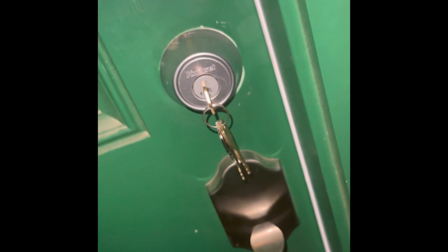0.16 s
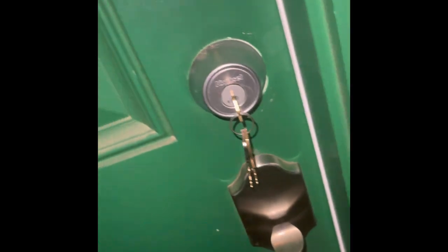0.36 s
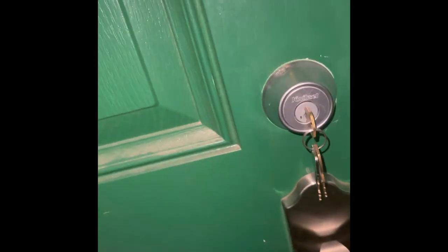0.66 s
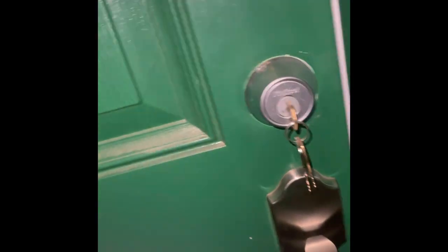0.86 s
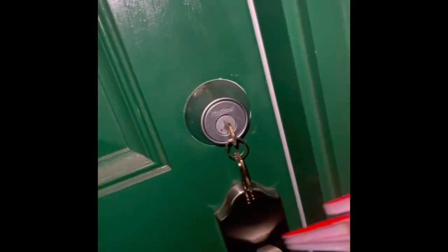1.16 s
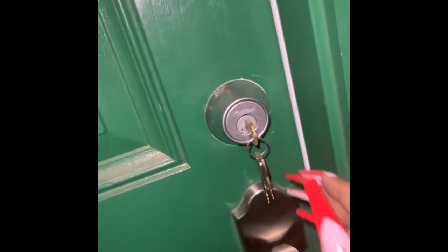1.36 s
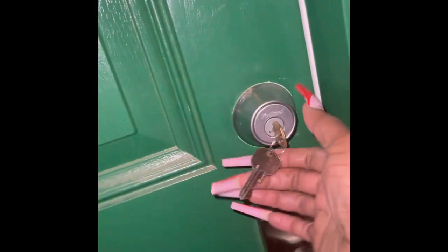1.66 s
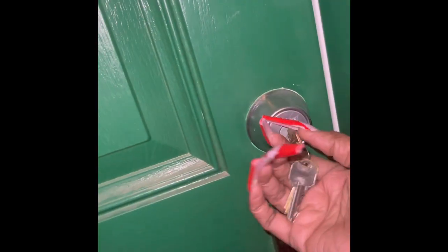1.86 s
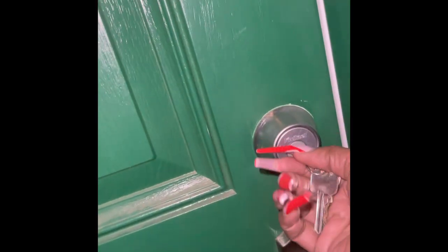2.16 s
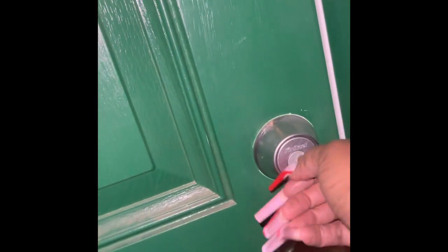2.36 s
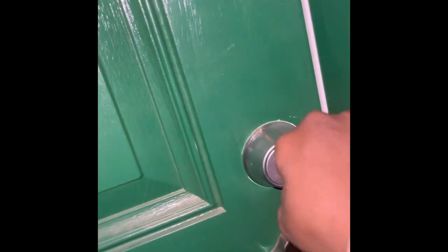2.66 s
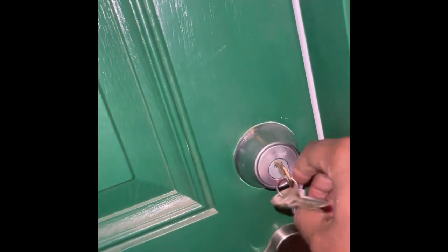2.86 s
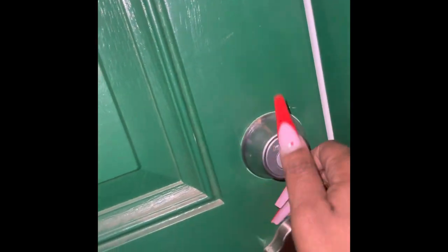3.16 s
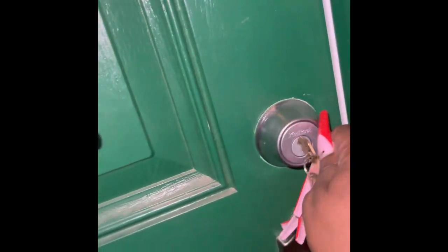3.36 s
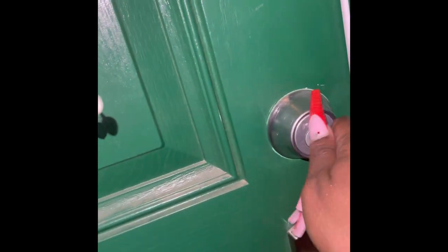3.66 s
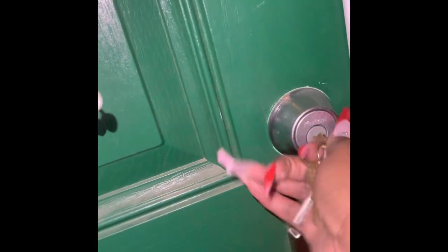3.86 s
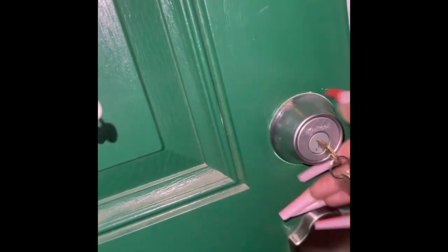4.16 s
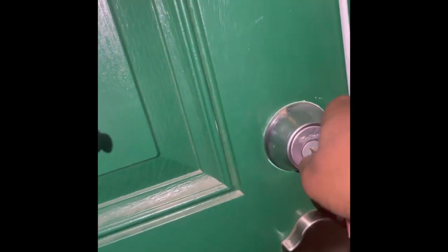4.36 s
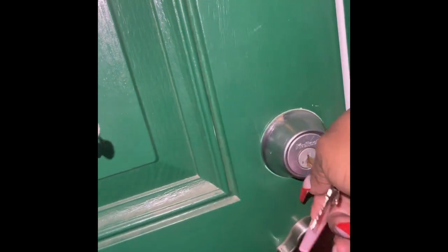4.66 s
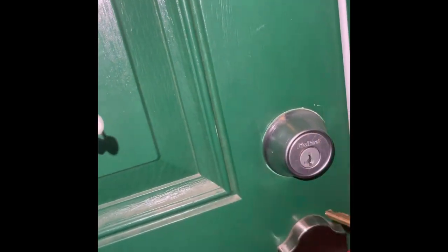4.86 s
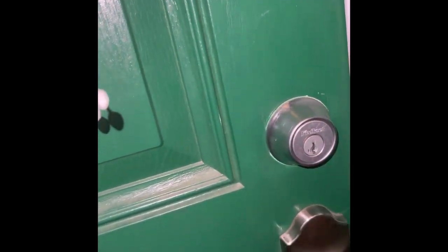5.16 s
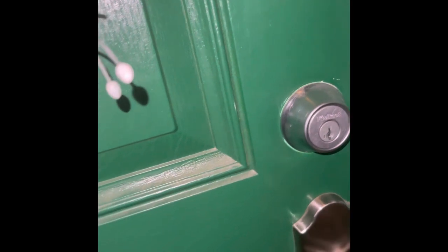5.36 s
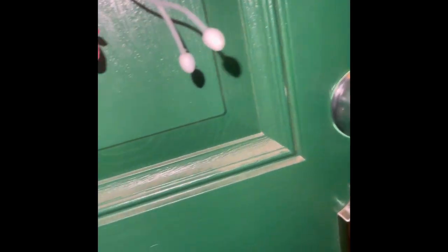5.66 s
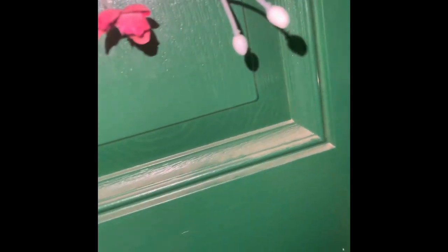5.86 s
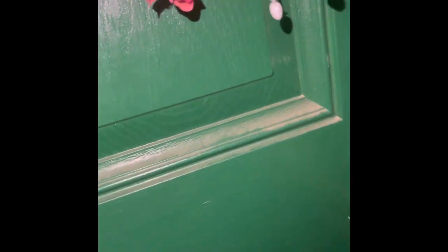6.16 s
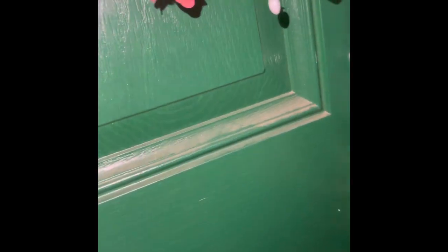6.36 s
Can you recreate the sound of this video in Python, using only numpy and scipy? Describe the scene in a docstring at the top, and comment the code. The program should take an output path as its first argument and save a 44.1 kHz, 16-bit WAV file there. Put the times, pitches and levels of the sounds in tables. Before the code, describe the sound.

A close hand-held microphone picks up a front door lock in a small, quiet porch. From 0 to 1.2 seconds, the shifting grip makes strong rustling, humming rubs, dull bumps and crisp clicks, easing gradually. Around 1.55 to 1.9, keys clink brightly with short rings, small ticks and a scuff. From 2.3, a key scrapes softly against brass pins; a click comes at 2.75, then a hard double clack at 2.98 as the bolt snaps and rings, with keys jingling until 3.4. Another ringing click falls near 3.65, followed by light scratching, faint clinks and a small thud at 4.74. After a quieter pause, loose keys rattle at 5.45 to 5.6. At 5.74 the door gives the loudest sound, a sharp woody knock with deep rumble, then brushes along its seal with small bumps, fading into still air by 6.5.

```python
"""A hand works a key in the deadbolt of a panelled front door, close to a hand-held microphone.
First the grip rustles (rubbing noise and a humming housing) with dull bumps; keys clink in ringing modes.
The lock clicks in short noise bursts, brass pins ring under scraping hiss, and the bolt snaps back ringing.
The key is drawn out, the bunch jangles in dense touches, and the door gives with a modal knock
and brushes along its seal. Reflections of the porch, handling rumble and still air lie around it all."""
import sys
import numpy as np
from scipy import signal
from scipy.fft import rfft, irfft, next_fast_len
from scipy.io import wavfile

SR = 44100
rng = np.random.default_rng(int(sys.argv[2]) if len(sys.argv) > 2 else 0)


def to_wav(s):
    """Save 16-bit WAV."""
    ch = np.atleast_2d(s).T  # columns
    pcm = np.round(np.clip(ch, -1, 1) * 32767)  # PCM
    wavfile.write(sys.argv[1], SR, pcm.astype(np.int16))


N = 287532
TIME = np.arange(N) / SR

# ringing modes of the keys when left free: pitch_hz, level_db, t60_s
KEY_MODES = [(7350, -2.5, 0.21), (7800, -0.5, 0.11), (8060, 0.5, 0.24), (10180, -1, 0.3),
             (10490, 3.5, 0.32), (10800, -12, 0.099), (11780, -3.5, 0.25), (12850, -5, 0.15),
             (14150, -16, 0.22)]


def from_db(db):
    """Decibels to gain."""
    return 10 ** (np.asarray(db) / 20)


def rms_one(x):
    """Scale to unit power."""
    return x / np.sqrt(np.mean(x ** 2) + 1e-20)


def in_time(rows):
    """The columns of a curve, sample by sample."""
    s, *columns = np.transpose(rows)
    return [np.interp(TIME, s, column) for column in columns]


def at_hz(points, hz):
    """Read a table on a log-frequency axis."""
    f, value = np.transpose(points)
    return np.interp(np.log(np.maximum(hz, 1)), np.log(f), value)


def bins(size):
    """Frequencies of a real spectrum in Hz."""
    return np.arange(size // 2 + 1) * SR / size


def band(x, low_hz, high_hz, order=2):
    """Causal band-pass."""
    edges = [low_hz, min(high_hz, SR / 2 - 1000)]
    return signal.sosfilt(signal.butter(order, edges, "band", fs=SR, output="sos"), x + 1e-18)


def add(track, s, sound):
    """Mix a short sound in at time s."""
    i = max(round(s * SR), 0)
    track[..., i:i + sound.shape[-1]] += sound[..., :N - i]


def drift(rate_hz):
    """A smooth random curve through normal draws of spread 1, rate_hz of them a second."""
    knots = np.arange(0, N / SR + 1, 1 / rate_hz)
    return np.interp(TIME, knots, rng.standard_normal(8192)[:len(knots)])


def ring(impulses, hz, t60):
    """A damped resonator: a unit impulse sets a sine of height 1 ringing."""
    r, w = from_db(-60 / (t60 * SR)), 2 * np.pi * hz / SR
    return signal.lfilter([0, np.sin(w)], [1, -2 * r * np.cos(w), r * r], impulses + 1e-18)


def resonate(x, hz, width_hz):
    """A resonance with gain 1 on top."""
    r = np.exp(-np.pi * width_hz / SR)
    zeros = np.array([1, 0, -1]) * (1 - r * r) / 2
    poles = [1, -2 * r * np.cos(2 * np.pi * hz / SR), r * r]
    return signal.lfilter(zeros, poles, x + 1e-18)


def spread(pair, colour=None):
    """Two unrelated signals become left and right, as alike as the ports hear them."""
    # likeness of the two microphone ports: pitch_hz, likeness (0-1)
    likeness = [(60, 1), (250, 0.99), (700, 0.51), (1500, 0.063), (4500, 0.31), (6500, 0.96), (10000, 0.96),
                (14000, 0.12)]
    size = next_fast_len(N + 4096)
    hz = bins(size)
    mid, side = rfft(pair, size)
    alike = np.clip(at_hz(likeness, hz), 0, 1)
    both = np.sqrt((1 + alike) / 2) * mid + np.sqrt((1 - alike) / 2) * side * [[1], [-1]]
    gain = 1 if colour is None else from_db(at_hz(colour, hz))
    return irfft(both * gain, size)[:, :N]


def contacts(force):
    """All hard contacts: clicks, one rebound of each, and stray ticks whose level follows the rubbing."""
    # key, pins, fingernails and latch touching: start_s, crack_level_db, sizzle_over_crack_db, crack_pitch_hz
    click_rows = [(0.086, -24.5, -2, 6050), (0.1884, -17, 3, 3430), (0.363, -26.5, -5, 4360),
                  (0.593, -30, -14, 3240), (0.621, -28, -0.5, 4400), (0.661, -29, -8, 2800),
                  (0.899, -28, -0.5, 4500), (0.9482, -34.5, -21, 1710), (1.085, -33.5, -7, 3900),
                  (1.2628, -26, 0, 4000), (1.4335, -42, -24, 3900), (1.6119, -36.5, -12, 3300),
                  (1.6306, -33.5, -1.5, 1510), (1.6573, -29.5, 8.5, 2960), (1.7512, -39, -6, 3140),
                  (1.767, -37, -6, 1600), (1.829, -33.5, 0, 2770), (1.847, -35.5, -4, 4300),
                  (1.8639, -36, 3, 3520), (2.1213, -46, -0.5, 3000), (2.291, -42, 1, 3080),
                  (2.5299, -26, -19, 3800), (2.572, -29.5, -3, 3180), (2.755, -25, 3, 3280),
                  (2.8793, -33, 4.5, 4060), (2.9356, -37.5, 10.5, 2080), (2.975, -12.5, -16, 3400),
                  (2.985, -16.5, -11, 2260), (3.2682, -36.5, -5.5, 3620), (3.311, -37.5, -6, 2720),
                  (3.3455, -42, 7, 3250), (3.5487, -33, 4.5, 3400), (3.6162, -38, 6, 2220),
                  (3.6644, -25.5, 9.5, 6050), (3.859, -44.5, 10, 2600), (3.947, -38.5, 1.5, 3500),
                  (4.0936, -33, 6.5, 4560), (4.2893, -35.5, 7.5, 4500), (4.311, -31.5, -4, 5330),
                  (4.336, -34.5, -6, 3520), (4.4216, -45, -4, 2040), (4.581, -41, 9.5, 3400),
                  (4.713, -31.5, 4.5, 3100), (4.738, -27, 2.5, 3100), (4.9042, -41, -20, 2800),
                  (5.6542, -28, -0.5, 4200), (5.739, -16.5, -5, 2860), (5.7423, -14.5, -5, 3220),
                  (5.9345, -33.5, -18, 1990), (6.106, -37, -10, 2250), (6.157, -44.5, -14, 1700),
                  (6.414, -42, -6, 1500)]
    rebound_s, rebound_loss_db = 0.011, 13
    tick_count, tick_over_rub_db, tick_spread_db = 140, 3, 4

    rebounds = []
    for (s, db, bright_db, hz), (late, luck) in zip(click_rows, rng.uniform(-1, 1, (len(click_rows), 2))):
        rebounds.append((s + rebound_s * 2 ** late, db - rebound_loss_db + 3 * luck, bright_db, hz))

    ticks = []
    moments = rng.integers(0, N, tick_count)
    for i, (size, hard, pitch) in zip(moments, rng.uniform(-1, 1, (tick_count, 3))):
        db = 20 * np.log10(force[i] + 1e-6) + tick_over_rub_db + tick_spread_db * size
        ticks.append((TIME[i], db, 6 * hard - 6, 3000 * 2 ** (.7 * pitch)))
    return [*click_rows, *rebounds, *ticks]


def clicks(rows, rattle_db=-23, rattle_s=0.016, pitch_width_hz=700, broad_share=0.6):
    """Noise bursts give each contact a body, a pitched crack and a sizzle, coloured by the lock case."""
    # resonances of the lock case: pitch_hz, width_hz, level_db
    case_modes = [(2165, 190, 3), (2910, 2070, 4), (5760, 3800, 1.5), (9420, 4300, 9.5)]
    # body, crack and sizzle: low edge and high edge (Hz), decay (s)
    layers = ((220, 1300, .003), (1500, 6000, .0012), (6500, 12000, .001))
    # the hollow body grows more slowly than the crack
    body_at_0_db_crack, body_follows = -24, 0.65

    t, window = TIME[:4096], round(.006 * SR)
    noise = rng.standard_normal((len(rows), 3, 2, len(t)))
    out = np.zeros((2, N))
    for k, (low, high, decay_s) in enumerate(layers):
        # the slower decay is a short rattle of loose parts
        burst = noise[:, k] * (np.exp(-t / decay_s) + from_db(rattle_db) * np.exp(-t / rattle_s))
        coloured = sum(from_db(db) * resonate(burst, hz, width) for hz, width, db in case_modes)
        burst = band(0.14 * burst + coloured, low, high, order=4)
        for (s, db, bright_db, hz), sound in zip(rows, burst):
            if k == 1:
                sound = broad_share * sound + resonate(sound, hz, pitch_width_hz)
            level_db = (body_at_0_db_crack + body_follows * db, db, db + bright_db)[k]
            loudness = np.std(sound[:, :window], axis=1, keepdims=True)
            add(out, s, from_db(level_db) * sound / loudness)
    return spread(out)


def bolt(focus_db=14):
    """The steel bolt rings on after each stop, most near the pitch that the blow favours."""
    # the bolt hits its stops: start_s, level_db (before the mode levels), favoured_pitch_hz
    snaps = [(2.755, -44, 4700), (2.9754, -27.5, 4300), (2.985, -36, 6675), (3.664, -39.5, 6675),
             (3.688, -49.5, 2046)]
    # modes of the bolt and its spring: pitch_hz, level_db, t60_s
    modes = [(2046, 2, 0.24), (3941, -2.5, 0.54), (4517, -10, 0.197), (6675, 6, 0.33)]
    out = np.zeros(N)
    for hz, mode_db, t60 in modes:
        blows = np.zeros(N)
        for s, db, lead_hz in snaps:
            octaves_off = np.log2(hz / lead_hz)
            add(blows, s, from_db([db + mode_db - focus_db * octaves_off ** 2 / 2]))
        out += ring(blows, hz, t60)
    return out


def clinks(focus_db=6, focus_hz=200, chatter_s=0.0082, settle_db=-4, settle_s=0.034, detune_hz=20, uneven_db=4):
    """Keys ring in their modes after a brief rattle; the contact favours one mode, the fingers damp them."""
    # key against key: start_s, level_db (before the trim in the scene), favoured_pitch_hz,
    # share of the free ringing time that the hand leaves (0-1), rattle_over_ring_db
    clink_rows = [(1.556, -20, 10490, 0.88, -2), (1.7307, -34.5, 10490, 0.34, -7),
                  (1.7662, -12, 10490, 0.3, -7), (1.771, -22, 7350, 0.15, -11),
                  (2.9, -24.5, 7350, 0.43, -12), (2.986, -20, 10490, 0.82, -12),
                  (2.9964, -21, 11780, 1, -11), (3.052, -25, 10490, 0.45, -19),
                  (3.1337, -14, 10490, 0.33, -13), (3.15, -14, 7800, 0.71, -12),
                  (3.193, -27.5, 11780, 0.4, -9), (3.311, -31.5, 8060, 0.9, -6),
                  (3.6273, -27, 7350, 0.73, -1), (4.045, -24.5, 11780, 1, -7),
                  (4.122, -32, 11780, 0.59, -4), (4.4, -35, 11780, 1, -7), (5.015, -31, 10800, 0.23, -2),
                  (5.087, -43.5, 7800, .4, 0), (5.1278, -35, 10800, 0.55, -14),
                  (5.4555, -31, 7350, 0.6, 3.5), (5.488, -29.5, 12850, 0.44, 10),
                  (5.521, -28, 10180, 0.43, 8), (5.581, -27, 10490, 0.25, 7)]
    t, out = TIME[:10000], np.zeros((2, N))
    hz, mode_db, t60 = np.transpose(KEY_MODES)[:, :, None]
    chance = rng.standard_normal((len(clink_rows), 4, len(hz), 1))
    chatters = rattle((len(clink_rows), len(t))) * np.exp(-t / chatter_s)
    # the keys lose part of their swing as they settle against each other
    settle = np.exp(-t / settle_s) + from_db(settle_db)
    onset = 1 - np.exp(-t / .0004)
    for row, (strength, grip, detune, phase), chatter in zip(clink_rows, chance, chatters):
        s, db, lead_hz, free, rattle_db = row
        favour_db = focus_db * np.exp(-((hz - lead_hz) / focus_hz) ** 2)
        gain = from_db(mode_db + uneven_db * strength + favour_db)
        damped_t60 = t60 * free * np.exp(-np.abs(grip) / 2)
        fade = settle * np.exp(-np.log(1000) * t / damped_t60)
        sines = np.sin(2 * np.pi * (hz + detune_hz * detune) * t + np.pi * phase)
        modes = np.sum(gain * fade * sines, axis=0)
        # both parts are levelled over their first 12 ms
        sound = modes / np.std(modes[:530]) + from_db(rattle_db) * chatter / np.std(chatter[:530])
        add(out, s, from_db(db) * sound * onset)
    return out


def jingle(per_s=400, flutter_db=7.5, ring_share=0.21, rattle_db=-8):
    """Many faint touches keep the keys shimmering while the hand moves them; hanging free, they rattle more."""
    # spells of restless keys: start_s, end_s, level_db (before flutter)
    spells = [(1.77, 1.848, -47), (2.82, 3.184, -41), (2.974, 3.036, -35), (3.304, 3.41, -43),
              (4.176, 4.234, -37), (5.468, 5.578, -39)]
    # the bunch hangs free and shakes: start_s, end_s, rattle_level_db (before flutter)
    free_shake = (5.48, 5.585, -35)
    touches = rng.random(N) < per_s / SR
    shimmer = np.zeros(N)
    for hz, db, t60 in KEY_MODES:
        shimmer += ring(touches * rng.standard_normal(N) * from_db(db), hz, t60 * ring_share)
    shimmer = rms_one(band(shimmer, 5800, 14800, order=4))
    motion = sum(spell(*row) for row in spells)
    knocking = rattle(N) * (from_db(rattle_db) * motion + spell(*free_shake))
    return (shimmer * motion + knocking) * from_db(flutter_db * drift(70))


def rattle(shape, per_s=2500):
    """Keys and ring knock together too fast to ring out: a dense, broad, metallic cluster."""
    # broad resonances of the whole bunch on its ring: pitch_hz, width_hz, level_db
    bunch_modes = [(6190, 350, -0.5), (7170, 860, -7), (10100, 580, 13.5), (10800, 860, 8), (12850, 330, 4),
                   (14300, 400, -10.5)]
    touches = rng.standard_normal(shape) * (rng.random(shape) < per_s / SR)
    # neighbouring resonances alternate in sign
    cluster = sum((-1) ** k * from_db(db) * resonate(touches, hz, width)
                  for k, (hz, width, db) in enumerate(bunch_modes))
    return rms_one(band(cluster, 4500, 17400))


def spell(start, end, db, swell_s=0.01, die_s=0.027):
    """The keys swing up to a level and die away once the hand stops."""
    swell = 1 - np.exp(-np.maximum(TIME - start, 0) / swell_s)
    return from_db(db) * swell * np.exp(-np.clip(TIME - end, 0, 1) / die_s)


def door(swell_cycles=0.59):
    """Leaf modes swell over a part of their cycle, so low ones come late; hard blows wake the woody panels."""
    # blows on the leaf: start_s, level_db (before the mode levels), hardness_hz (drive falls off above it)
    blows = [(1.418, -37.5, 100), (1.829, -39, 400), (2.975, -35, 500), (4.737, -37.5, 800),
             (5.74, -12, 3500), (5.934, -28, 250), (5.985, -26, 150)]
    # modes from the whole leaf up to its thin panels: pitch_hz, level_db, t60_s
    modes = [(53.6, -1.5, 0.33), (116.2, -0.5, 0.39), (154.8, -10, 0.34), (184.4, 0, 0.14), (241, -5, 0.23),
             (274, -6, 0.1), (447, -3.5, 0.071), (522, -16.5, 0.22), (762, -9.5, 0.2), (1163, -5.5, 0.11),
             (1850, -8, 0.071), (2205, -19.5, 0.17), (2550, -10, 0.083), (2970, -14, .12),
             (3390, -12, 0.092)]
    t, out = TIME[:SR // 2], np.zeros(N)
    hz, mode_db, t60 = np.transpose(modes)[:, :, None]
    swell = 1 - np.exp(-t * hz / swell_cycles)
    shape = from_db(mode_db) * swell * np.exp(-np.log(1000) * t / t60)
    for (s, db, hard_hz), phase in zip(blows, rng.standard_normal((len(blows), len(hz), 1))):
        drive = from_db(db) / np.hypot(1, (hz / hard_hz) ** 2)
        add(out, s, np.sum(drive * shape * np.sin(2 * np.pi * hz * t + phase), axis=0))
    return out


def strokes(attack_s=0.0072, release_s=0.028):
    """Strength of the dull rub and of the hiss: each stroke swells, holds and lets go."""
    # hand, key in its cylinder, door on its seal: start_s, length_s, dull_rub_db, hiss_db (before later trims)
    stroke_rows = [(0.069, 0.0077, -38, -43), (0.173, 0.0089, -34, -36), (1.597, 0.07, -38.5, -55),
                   (1.769, 0.015, -33.5, -42.5), (1.818, 0.048, -32, -43.5), (1.974, 0.023, -40.5, -52.5),
                   (2.315, 0.3, -40.5, -55.5), (2.747, 0.047, -36.5, -45.5), (2.864, 0.18, -39, -49),
                   (3.028, 0.16, -43.5, -49), (3.291, 0.14, -44.5, -48.5), (3.508, 0.17, -42.5, -48),
                   (3.75, 0.3, -45, -50.5), (4.069, 0.17, -40, -53.5), (4.269, 0.2, -44, -50),
                   (4.531, 0.17, -44, -52), (4.706, 0.062, -33, -53), (5.445, 0.14, -32, -44),
                   (5.614, 0.12, -30, -50), (5.737, 0.35, -35, -43), (6.217, 0.081, -39.5, -50.5)]
    t, out = TIME[:SR], np.zeros((2, N))
    for start, length, rub_db, hiss_db in stroke_rows:
        shape = (1 - np.exp(-t / attack_s)) * np.exp(-np.maximum(t - length, 0) / release_s)
        add(out, start, from_db([[rub_db], [hiss_db]]) * shape)
    return out


def scraping(force, uneven_db=1.0, scratch_share=0.27, pin_share=1.2):
    """Hiss and scratches follow the force of the rubbing; the pins join in while the key is worked."""
    # the key is being worked in the cylinder: time_s, share (0-1)
    key_work = [(2.2, 0), (2.4, 1), (4.7, 1), (4.8, 0)]
    # colour of the rubbing hiss: pitch_hz, level_db (per Hz)
    hiss_colour = [(800, -8.5), (1500, 7.5), (2200, 6.5), (2800, 9.5), (3600, 6), (5000, -8.5), (6500, -12),
                   (8500, -2), (10800, 2.5), (12200, -22), (14000, -56)]
    # colour of the bright sizzle of hard rubbing: pitch_hz, level_db (per Hz)
    sizzle_colour = [(2500, -18), (4000, -0.5), (6300, 1.5), (8500, 3), (10700, 5), (12300, -8.5),
                     (14000, -50.5)]
    working, = in_time(key_work)
    force_db = 20 * np.log10(force + 1e-6) + uneven_db * drift(30)
    scratches = scuffs(hiss_colour, per_s=55, size_db=5, catch_s=.002)
    grain = scratch_share * scratches + pin_share * band(pins(), 1340, 8000) * working
    smooth = friction(hiss_colour, grains_per_s=900, grain_db=4.0, smooth_share=0.35, flutter_db=4.5)
    hiss = from_db(force_db - 4.0) * (smooth + grain)
    # hard rubbing grows bright faster than it grows loud
    sizzle_db = force_db + 0.46 * (force_db + 40.5)
    sizzle = scuffs(sizzle_colour, per_s=480, size_db=1.0, catch_s=0.0047)
    return hiss + from_db(sizzle_db - 0.3) * sizzle


def pins(per_s=70, size_db=6, cycles=16, low_hz=1950, high_hz=5200, count=18):
    """The key's teeth trip small brass parts; each gives a brief note of its own."""
    sizes = from_db(size_db * np.minimum(rng.exponential(1, N), 2)) * rng.choice([-1, 1], N)
    trips = sizes * (rng.random(N) < per_s / SR)
    dealt = rng.integers(0, count, N)
    pitches = np.geomspace(low_hz, high_hz, count)
    return rms_one(sum(ring(trips * (dealt == k), hz, cycles / hz) for k, hz in enumerate(pitches)))


def scuffs(colour, per_s, size_db, catch_s):
    """The surfaces catch and let go: tiny scratches of uneven size that start at once and die fast."""
    sizes = from_db(size_db * np.minimum(rng.exponential(1, N), 2))
    catches = (rng.random(N) < per_s / SR) * sizes
    force = signal.lfilter([1], [1, -np.exp(-1 / (catch_s * SR))], catches + 1e-18)
    return rms_one(spread(rng.standard_normal((2, N)) * force, colour))


def friction(colour, grains_per_s, grain_db, smooth_share, flutter_db):
    """Tiny slips of uneven size over a smooth hiss, fluttering with the pressure."""
    sizes = from_db(grain_db * np.minimum(rng.exponential(1, N), 4))
    slips = (rng.random(N) < grains_per_s / SR) * sizes
    drive = rms_one(slips) + smooth_share
    rubbing = spread(rng.standard_normal((2, N)) * drive, colour)
    return rms_one(rubbing * from_db(flutter_db * drift(90)))


def bumps(contact_s=0.0086, width_hz=230):
    """A soft contact gives a short hollow note: a noise burst through one wide resonance."""
    # dull bumps of fingers and door: start_s, level_db (before the trim in the scene), pitch_hz
    bump_rows = [(0.018, -14, 633), (0.024, -15.5, 292), (0.0775, -16, 790), (0.1892, -16.5, 875),
                 (0.322, -20.5, 355), (0.405, -21.5, 860), (0.476, -24, 850), (0.6603, -20, 490),
                 (0.9478, -24, 754), (0.9858, -25, 460), (1.0817, -28, 670), (1.538, -31, 261),
                 (1.629, -26.5, 620), (1.832, -28, 347), (1.846, -27, 308), (1.872, -30, 365),
                 (5.3186, -33, 397), (5.741, -20.5, 660), (5.9329, -24.5, 540)]
    t, out = TIME[:3000], np.zeros(N)
    for (s, db, hz), noise in zip(bump_rows, rng.standard_normal((len(bump_rows), len(t)))):
        note = band(resonate(noise * np.exp(-t / contact_s), hz, width_hz), hz / 4, 2 * hz)
        add(out, s, from_db(db) * note / np.std(note[:440]))  # levelled over the first 10 ms
    return out


def housing():
    """Skin dragging on the microphone's body makes its housing hum; both ports hear it alike."""
    # resonances of the housing under the shifting grip: pitch_hz, width_hz, level_db
    housing_modes = [(528, 44, -9.5), (876, 56, 0.5), (2320, 36, 34.5), (2720, 58, 39)]
    # colour of the dull rubbing: pitch_hz, level_db (per Hz)
    rub_colour = [(110, 5.5), (200, 3.5), (290, 4), (410, -1), (600, 0.5), (880, -4), (1200, -6.5),
                  (1700, -37), (3000, -54)]
    drag = friction(rub_colour, grains_per_s=220, grain_db=1.5, smooth_share=1.0, flutter_db=1).mean(axis=0)
    hum = sum(from_db(db) * resonate(drag, hz, width) for hz, width, db in housing_modes)
    return rms_one(band(drag + hum, 60, 5000))


def ports(x):
    """Phase shifts by pitch: sound from the lock reaches the left port before the right."""
    # lead of the left port: pitch_hz, lead_cycles
    port_lead = [(0, 0), (300, .04), (780, .45), (1200, .55), (1900, 1), (5600, 2.95), (8350, 3.45),
                 (9800, 3.5), (12000, 4)]
    size = next_fast_len(N + 4096)
    lead = np.interp(bins(size), *np.transpose(port_lead))
    return irfft(rfft(x, size) * np.exp(1j * np.pi * lead * [[1], [-1]]), size)[:, :N]


def porch(x, near_db=-11, near_s=0.0078, tail_db=-21, near_width=0.58):
    """Quick reflections off door and hand sway as the microphone moves; a faint tail dies soonest in the treble."""
    # decay of the porch: pitch_hz, t60_s
    porch_decay = [(100, 0.82), (500, 0.11), (2500, 0.2), (7000, 0.04), (14000, 0.039)]
    t, octave_edges = TIME[:SR // 3], 60 * 2. ** np.arange(9)
    white = rng.standard_normal((3, 2, len(t)))
    # near_width sets how much the quick reflections differ between the ports (0-1)
    common = np.sqrt(1 - near_width ** 2) * white[:2, :1]
    walls = common + near_width * white[:2, 1:] * [[1], [-1]]
    near = band(walls * np.exp(-t / near_s) * (t > .001), 174, 3900)

    tail = np.zeros((2, len(t)))
    for f in octave_edges:
        t60 = at_hz(porch_decay, f * np.sqrt(2))
        tail += band(white[2], f, 2 * f) * np.exp(-np.log(1000) * t / t60)
    tail *= t > .006

    here, there, far = [signal.fftconvolve(x, rms_one(h) / np.sqrt(len(t)), axes=1)[:, :N]
                        for h in (*near, tail)]
    sway = 2 * drift(5)
    return from_db(near_db) * (np.cos(sway) * here + np.sin(sway) * there) + from_db(tail_db) * far


def handling_rumble():
    """Low friction noise of the hand on the microphone, rising and falling in level."""
    # strength of the rumble: time_s, level_db (before the trim below)
    handling = [(0.0, -37.5), (1.34, -43), (1.87, -37), (2.12, -43), (3.0, -41), (4.49, -49), (4.77, -36.5),
                (5.12, -51.5), (5.63, -42.5), (5.8, -26), (6.52, -52.5)]
    # colour of the rumble: pitch_hz, level_db (per Hz)
    rumble_colour = [(22, -7.5), (40, -12.5), (58, 9), (80, -3.5), (115, 1), (160, -18), (240, -6.5),
                     (330, -32.5), (500, -65)]
    level_db, = in_time(handling)
    noise = friction(rumble_colour, grains_per_s=360, grain_db=3.0, smooth_share=0.58, flutter_db=1.5)
    return from_db(level_db - 3.5) * noise


def still_air(level_db=-56.5):
    """Steady coloured noise stands for the still air on the porch."""
    # colour of the air: pitch_hz, level_db (per Hz, before levelling)
    air_colour = [(59, -31.5), (100, -8), (512, -20.5), (900, -33.5), (1920, -24), (6790, -31), (9260, -49),
                  (10700, -31), (14000, -71)]
    return from_db(level_db) * rms_one(spread(rng.standard_normal((2, N)), air_colour))


def scene():
    """Metal, door and strokes sound through the air; rumble, bumps and the shifting grip come through the body."""
    # the grip shifts on the microphone, then settles: time_s, dull_rub_db, hiss_db (before later trims)
    grip_shift = [(0, -23, -27.5), (0.47, -27.5, -33), (0.51, -30, -40), (0.82, -39.5, -47.5),
                  (1.0, -40, -44), (1.15, -44.5, -52), (1.35, -49.5, -59), (2.0, -55, -61)]
    # colour of the door panel under a rubbing hand: pitch_hz, level_db (per Hz)
    panel_colour = [(30, -21.5), (110, 4), (200, 0), (270, 7), (350, -5), (430, 4.5), (520, -3.5),
                    (700, -2), (1100, -11), (1600, -4.5), (3000, -48)]
    grip_rub, grip_hiss = from_db(in_time(grip_shift))
    stroke_rub, stroke_hiss = strokes()
    force = grip_hiss + stroke_hiss

    metal = clicks(contacts(force)) + from_db(-1.0) * clinks() + bolt() + jingle()
    panel_rub = friction(panel_colour, grains_per_s=400, grain_db=1.0, smooth_share=1.0, flutter_db=-3.5)
    panel = from_db(-9.5) * stroke_rub * panel_rub
    airborne = ports(metal + scraping(force) + panel + door())

    # what travels through the body skips the lead between the ports
    grip = from_db(-6.0) * grip_rub * housing()
    carried = from_db(-7.5) * bumps() + grip + handling_rumble()
    return airborne + porch(airborne) + carried + still_air()


def record(dry, cutoff_hz=16200):
    """Loud peaks are rounded and the top is cut steeply."""
    steep_cut = signal.ellip(10, .1, 80, cutoff_hz, fs=SR, output="sos")
    return signal.sosfilt(steep_cut, np.tanh(dry))


dry = scene()
out = record(dry)
to_wav(out)
```